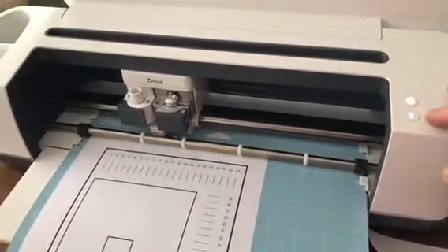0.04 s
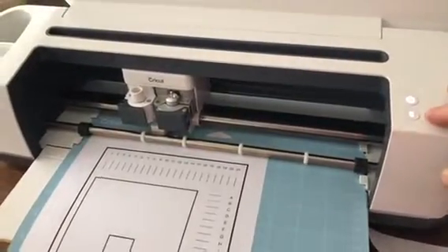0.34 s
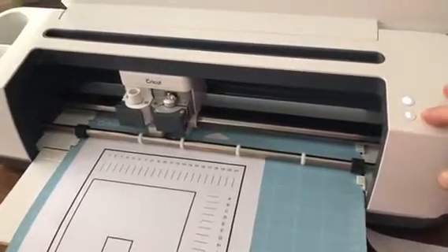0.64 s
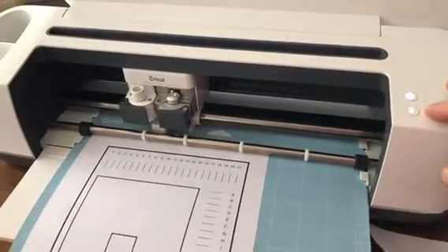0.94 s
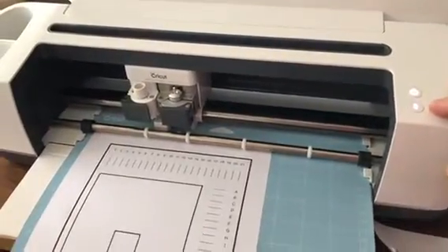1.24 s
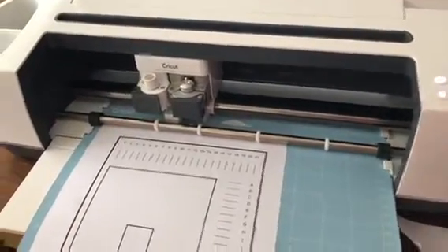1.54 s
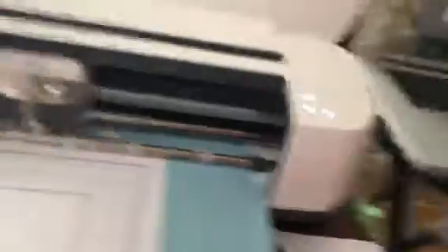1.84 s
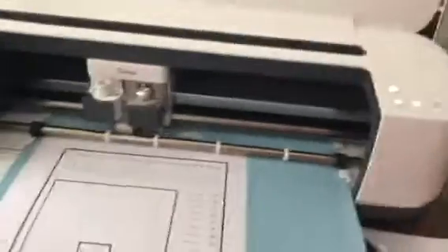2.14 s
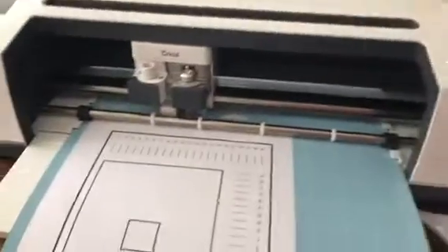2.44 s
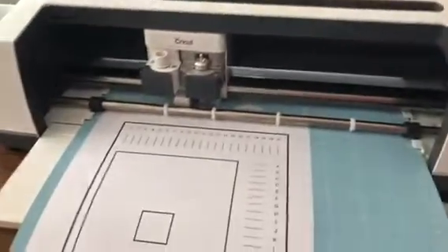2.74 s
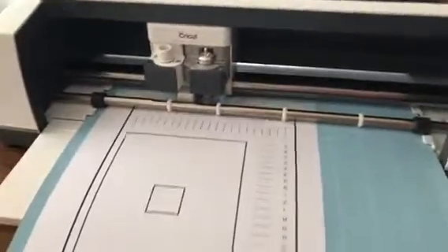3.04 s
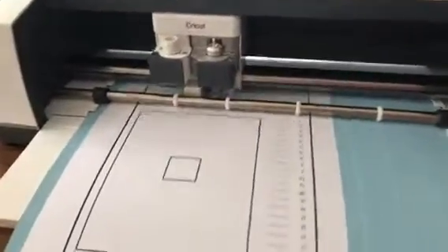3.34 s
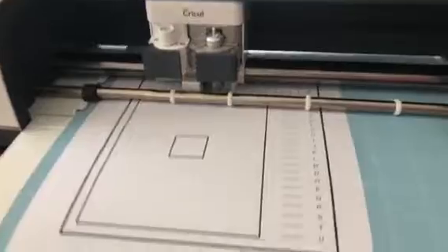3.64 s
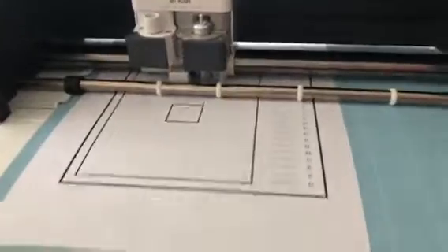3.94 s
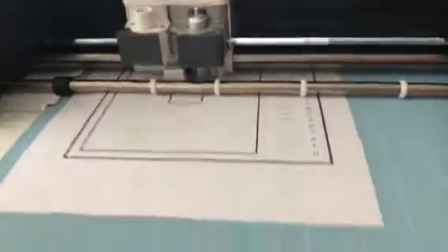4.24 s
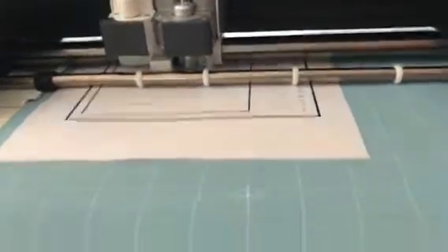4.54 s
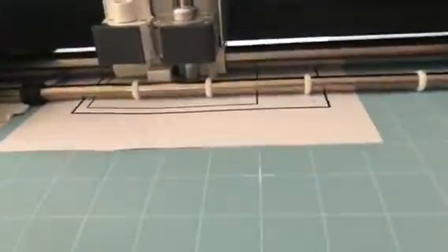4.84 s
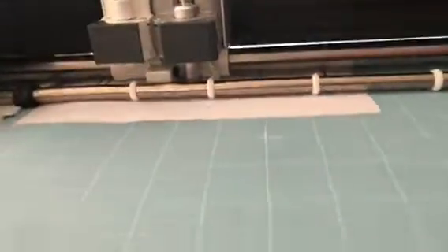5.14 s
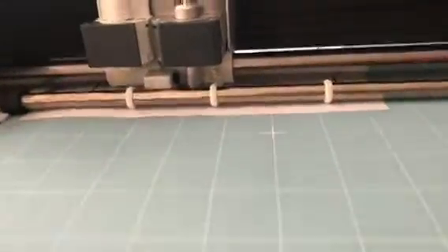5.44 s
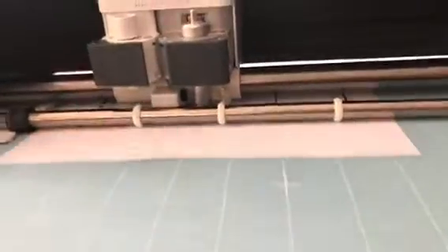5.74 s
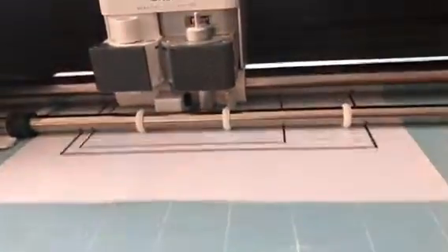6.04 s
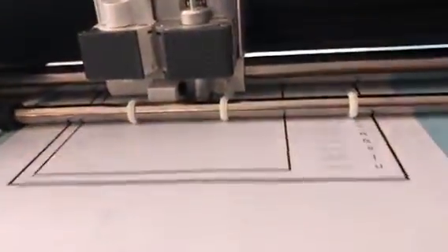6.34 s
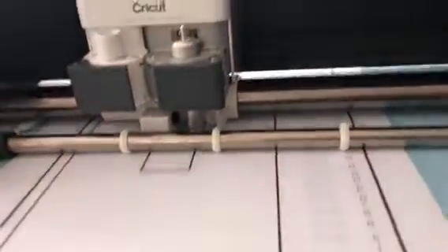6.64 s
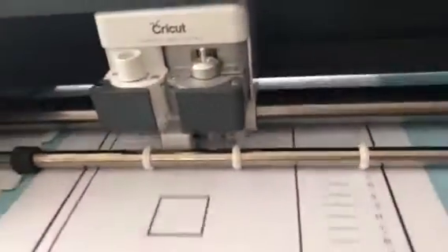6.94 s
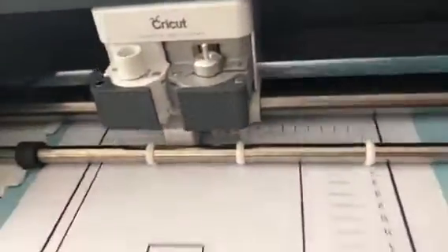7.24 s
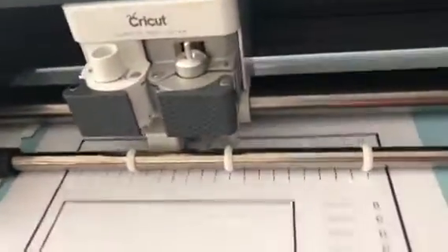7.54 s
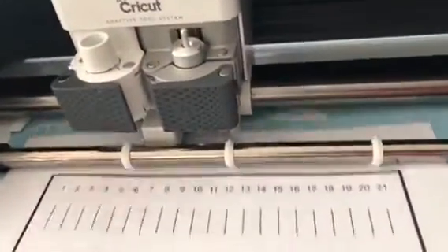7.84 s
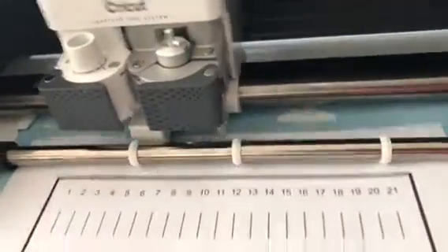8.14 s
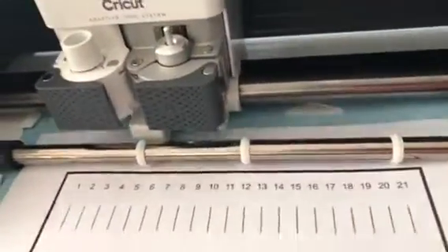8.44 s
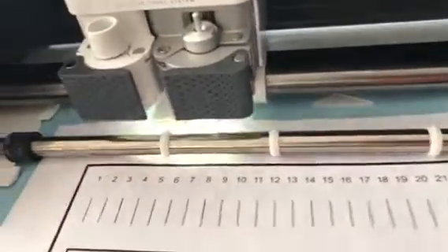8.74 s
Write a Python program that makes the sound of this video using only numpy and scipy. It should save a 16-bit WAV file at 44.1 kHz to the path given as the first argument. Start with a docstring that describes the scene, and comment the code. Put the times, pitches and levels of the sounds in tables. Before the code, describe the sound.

In a quiet room, a button clicks softly and a hand bumps and rubs the microphone. A small electric cutting machine then feeds a mat in with a steady geared whine, a low hum and a sliding hiss. It stops for an instant with a clack and feeds the mat back out, a little louder. After a short jog, the carriage creeps along with light ticks and squeaks, and the tool head clacks down close by.

```python
"""A small cutting machine in a quiet room.

A button clicks, and a hand bumps and rubs the microphone. A geared servo feeds a mat in,
stops and feeds it out: meshing teeth whine, sliding friction rumbles and hisses, the overhanging
mat hums and the drive whistles. After a short jog the carriage creeps along its rail, ticking
and squeaking, and the tool head clacks down."""
import sys
import numpy as np
from scipy import signal
from scipy.fft import rfft, irfft
from scipy.io import wavfile

SR = 44100
rng = np.random.default_rng(int(sys.argv[2]) if len(sys.argv) > 2 else 0)


def output_pcm(signal):
    """Save a mono or channel-first signal as 16-bit PCM at the path in sys.argv[1].

    Samples are clipped to [-1, 1] before scaling.
    """
    pcm = np.clip(np.atleast_2d(signal).T, -1, 1) * 32767
    wavfile.write(sys.argv[1], SR, np.round(pcm).astype(np.int16))


N = 396900
T = np.arange(N) / SR
BINS = np.fft.rfftfreq(N, 1 / SR)
CRUISE_HZ, PINION_TEETH = 62.28, 11  # shaft turns per second, teeth meshed per turn

# Moves of the mat: start_s, stop_s, direction (0 in, 1 out)
FEEDS = [(2.929, 5.537, 0), (5.537, 8.147, 1), (8.155, 8.365, 1)]
# Gear load as the mat's weight shifts, feeding in and feeding out: time_s, load_db, tooth_tone_db
LOAD_IN = [(3.12, -34.5, -39.5), (3.98, -32.5, -33.5), (5.08, -25, -29.5), (5.38, -28.5, -35.5)]
LOAD_OUT = [(5.7, -23, -34), (5.98, -21, -29), (6.4, -20, -27.5), (7.96, -26.5, -31)]
# Spectrum of an impact in the mechanism: frequency_hz, level_db
CLACK_SPECTRUM = [(59, -36), (100, -8), (310, 3), (867, 1), (1290, -1.5), (1920, -13), (2630, -17.5),
                  (3920, -24.5), (5370, -28), (6220, -39), (8000, -35.5), (13000, -48.5), (15000, -37)]


def servo_motion(ramp_s=.105, push_db=1.5, wheel_ratio=9.77, tightest_mesh_s=4.33):
    """Trapezoidal motion: the servo speeds up, cruises and brakes; its sounds follow these controls."""
    pressure_db = np.array([-1, -8.5, -9.5])  # tooth pressure while the speed changes, for each move
    starts, stops, directions = np.transpose(FEEDS)
    move = np.maximum(np.searchsorted(starts, T, side="right") - 1, 0)
    since, left, out = T - starts[move], stops[move] - T, directions[move]
    speed = np.clip(np.minimum(since, left) / ramp_s, 0, 1)
    step = CRUISE_HZ * speed * (1 + .00089 * drift(50)) / SR
    net_turns = np.cumsum(step * (1 - 2 * out))
    wheel_angle = 2 * np.pi * (net_turns - np.interp(tightest_mesh_s, T, net_turns)) / wheel_ratio
    loads = [curve(rows) - np.mean(rows, axis=0)[1] for rows in (LOAD_IN, LOAD_OUT)]
    return dict(speed=speed, out=out, since=since, turns=np.cumsum(step), wheel=wheel_angle,
                load_db=by_direction(loads, out), travel=np.clip(since / (stops[0] - starts[0]), 0, 1),
                ramp_db=pressure_db[move] + push_db * np.sign(left - since))


def gear_whine(servo, scatter_rad=.94, chatter=.37, hop=50):
    """Gear meshing: tooth tones and shaft sidebands sweep through the frame's resonances with speed."""
    # Partials of the gear train and of its slower wheels: shaft_multiple, in_db, out_db
    gear_partials = [(5, -60, -53.5), (6, -61, -58.5), (6.99, -56, -46), (8, -52, -47), (9, -54.5, -48.5),
                     (10, -51.5, -50), (12, -45, -43), (13, -53, -35.5), (14, -42, -38.5), (15, -62, -61.5),
                     (15.98, -53.5, -65), (17, -57, -62.5), (18, -46.5, -39), (19, -43, -34),
                     (20, -53, -36), (21, -42, -45), (23, -54.5, -35), (24.06, -51.5, -44.5),
                     (25, -71, -52.5), (27, -57, -49.5), (28, -59, -55.5), (29, -56, -51.5), (30, -58, -55),
                     (32, -55, -60), (33, -53.5, -47.5), (34, -52, -60), (37, -72, -53.5), (40, -58.5, -60),
                     (42, -68, -56), (44, -58, -54.5), (45, -61.5, -60), (50, -64, -68), (53, -74, -56),
                     (55, -52, -66), (56, -62, -71), (59, -71, -62), (61, -76, -64), (64.3, -79, -60),
                     (66, -66, -67), (78, -80, -66)]
    slow_partials = [(1.36, -64, -61.5), (2.27, -57, -57), (2.68, -56, -55), (3.333, -47.5, -43.5),
                     (4.44, -45.5, -45), (20.66, -44, -42), (21.35, -60, -43), (23.26, -50, -63),
                     (24.43, -55, -60), (34.33, -56.5, -53), (53.4, -65, -72), (56.4, -56.5, -70)]
    # Resonances of the frame: centre_hz, width_hz, lift_db
    frame_modes = [(300, 84, 7.5), (813, 83, 10), (1195, 53, 15.5), (1790, 49, 14.5)]
    changing = np.minimum(10 * abs(1 - servo["speed"]), 1)
    t, glide = T[::hop], changing[::hop]
    speed, out, load_db = (servo[key][::hop] for key in ("speed", "out", "load_db"))
    eccentricity = np.cos(servo["wheel"][::hop])  # the big wheel runs off centre
    swing_db = eccentricity * by_direction((4.1, 1.3), out)
    tooth_db = by_direction([curve(rows, t, column=2) for rows in (LOAD_IN, LOAD_OUT)], out)
    tooth_db += by_direction((.6, .4), out) + eccentricity * by_direction((.5, 1.5), out)
    octave_db = by_direction((-33.5, -23.5), out) + load_db + swing_db
    pressure_db = glide * servo["ramp_db"][::hop]
    rattle_db = by_direction((1.5, -1), out) + by_direction((.53, 1.6), out) * load_db + .5 * swing_db
    sing_db = by_direction((-4, -3), out) + by_direction((10, 9.5), out) * servo["travel"][::hop] ** 2

    sidebands = [(round(k), by_direction(levels, out)) for k, *levels in gear_partials]
    sidebands += [(k, by_direction(levels, out)) for k, *levels in slow_partials]
    for k in np.setdiff1d(np.arange(25, 80), [k for k, _ in sidebands]):
        in_db, out_db = -63 - 7 * np.log2(k / 22) + 3 * rng.standard_normal(2)
        sidebands.append((k, by_direction((in_db, out_db + 4), out)))  # faint lines from uneven teeth
    partials = [(k * PINION_TEETH, db + pressure_db + .87 * drift(25, t))
                for k, db in ((1, tooth_db), (2, octave_db))]
    for k, db in sidebands:
        wander_db, waver_db = 2.5 * drift(2.47, t), drift(25, t)
        db = db + waver_db - 3 * glide + wander_db * (k > 25)
        db += rattle_db * (17 < k < 25)  # lines around the tooth tone's octave follow the load
        db += sing_db * (k > 50)  # the highest lines grow through a move
        partials.append((k, db))

    shaft_angle, whine = 2 * np.pi * servo["turns"], np.zeros(N)
    for k, db in partials:
        sweep_db = lift_db(frame_modes, k * CRUISE_HZ * speed) - lift_db(frame_modes, k * CRUISE_HZ)
        gain = np.repeat(amp(db + sweep_db), hop)[:N]
        phase = scatter_rad * rng.standard_normal()  # nearly in step: one knock a turn
        whine += gain * np.cos(k * shaft_angle + phase)
    return np.sqrt(2) * whine * servo["speed"] ** 1.17 * (1 + chatter * changing * drift(500))


def rubbing(servo, squeal_hz=9170, squeal_width_hz=170):
    """Sliding friction: noise from teeth and rollers, amplitude-modulated by each turn and tooth."""
    # Noise density of the friction: frequency_hz, in_db, out_db
    friction_spectrum = [(30, -121, -123), (76.6, -78, -72.5), (207, -71, -66.5), (495, -68.5, -65.5),
                         (706, -71, -69.5), (1010, -82, -76), (1470, -76, -75), (2220, -81, -75.5),
                         (3160, -82, -83), (4030, -88, -84.5), (6900, -94.5, -92.5), (8970, -99, -89),
                         (10900, -101, -98.5), (12200, -100, -92), (15500, -100, -97.5)]
    # Resonances of the plastic case: centre_hz, width_hz, lift_db
    case_modes = [(262, 19.6, 15.5), (802, 75, 9.5), (1293, 122, 13.5), (3450, 110, 6), (8260, 250, 3)]
    speed, turns, out, travel = (servo[key] for key in ("speed", "turns", "out", "travel"))
    in_and_out = []
    for column in (1, 2):
        body_db = colour(friction_spectrum, BINS, column) + lift_db(case_modes, BINS)
        # The hiss slowly changes colour as the microphone moves: two rippled spectra crossfade.
        early, late = (noise(body_db + 2.5 * drift(60, BINS / 2500) * (BINS > 1800)) for _ in range(2))
        in_and_out.append(early * np.sqrt(1 - travel) + late * np.sqrt(travel))
    friction = by_direction(in_and_out, out)

    lows = signal.sosfiltfilt(signal.butter(4, 1800, fs=SR, output="sos"), friction)
    shake = np.maximum(speed, smooth(speed, time_s=.0075))  # the case rumbles on just after a stop
    rumble = lows * amp(1 + .39 * servo["load_db"]) * shake ** .58

    bite = (1 + .23 * np.cos(2 * np.pi * PINION_TEETH * turns)) * amp(.7 * drift(1600))
    near_db = np.interp(T, (3.28, 5.48), (-2, 2.5))  # the hiss grows as the microphone closes in
    end_db = out * np.interp(travel, (.66, 1), (0, 1.5))  # it swells late in the feed out
    hiss = (friction - lows) * bite * amp(near_db + end_db + .04 * servo["load_db"]) * speed ** 1.65

    # The mat squeals on its guides.
    squeal_band = unit(noise(-20 * np.log10(1 + ((BINS - squeal_hz) / squeal_width_hz) ** 2)))
    squeal_db = by_direction((-77, -55), out) + by_direction((10, -6), out) * travel
    squeal = squeal_band * amp(squeal_db + 3.6 * drift(130)) * speed ** 2
    pulse = 1 + .15 * np.cos(2 * np.pi * turns) + .034 * np.cos(2 * servo["wheel"])
    return pulse * (rumble + hiss + squeal)


def mat_hum(servo, pitch_hz=(98.6, 101), full_db=(-42, -34.5), full_s=(.98, 1.47),
            rise_db_per_s=18, sag_db_per_s=(-.5, 9)):
    """Resonance: the overhanging mat builds up a hum at its own pitch and rings on briefly at a stop."""
    out = servo["out"]
    past_full_s = servo["since"] - by_direction(full_s, out)
    level_db = by_direction(full_db, out) + rise_db_per_s * np.minimum(past_full_s, 0)
    level_db -= by_direction(sag_db_per_s, out) * np.maximum(past_full_s, 0)
    envelope = smooth(servo["speed"] * amp(level_db), time_s=.056)
    phase = 2 * np.pi * np.cumsum(by_direction(pitch_hz, out)) / SR + .34 * drift(8.2)
    return np.sqrt(2) * amp(1.4 * drift(15)) * envelope * np.sin(phase)


def drive_whistle(servo, chopper_hz=15003, commutator_bars=5, run_db=-67, hold_db=-75):
    """Amplitude modulation: commutator bars split the chopper's tone; a hiss surges in the jog."""
    speed = servo["speed"]
    powered = (T > FEEDS[0][0]) * (T < FEEDS[-1][1])
    level = powered * (amp(hold_db) * (1 - speed) + amp(run_db) * speed) * amp(4 * drift(30))
    ripple = 1 + .49 * np.cos(2 * np.pi * commutator_bars * servo["turns"])
    tone = np.sqrt(2) * np.sin(2 * np.pi * chopper_hz * T + .35 * drift(400))
    band = [(13000, -50), (14600, -14), (15000, 0), (15400, -14), (16000, -30)]  # frequency_hz, level_db
    surge = scrape([(8.235, .04, -56)], band, rise_db_per_s=130, fall_db_per_s=300, grain_db=2)
    return level * ripple * tone + surge


def button_clicks():
    """Impact excitation: the button's clicks set the modes of the lid ringing."""
    # Clicks of the button: start_s, level_db, tilt_db_per_octave
    clicks = [(1.367, -40.5, 0.5), (1.5195, -37, 1), (1.5395, -52, 3)]
    # Spectrum of a click: frequency_hz, level_db
    click_spectrum = [(120, -39), (220, -18.5), (340, -7), (520, 1.5), (790, -12.5), (1070, -5.5),
                      (1880, -12), (2500, -20.5), (3000, -17.5), (4400, -27.5), (5760, -23.5), (6800, -33),
                      (15000, -38)]
    # Resonances of the lid: pitch_hz, level_db, t60_s
    lid_modes = [(417, 8.5, .17), (590, 2, 0.171), (985, -9, .08), (1949, -13.5, .07), (2977, -15, .05)]
    return knocks(clicks, click_spectrum, lag_cycles=2, rattle=1.9, rattle_s=.0042,
                  modes=lid_modes, ring=.0044)


def mechanism_clacks():
    """Backlash and impact: the gears take up slack, the carriage knocks and the tool head drops."""
    # Blows in the mechanism: start_s, level_db, tilt_db_per_octave
    impacts = [(2.936, -46, -1.5), (5.545, -33, -1.5), (5.555, -32.5, -4.5), (8.157, -35, 0.5),
               (8.267, -33, 5), (8.559, -44, 3.5), (8.587, -44.5, 1), (8.646, -39.5, 2),
               (8.728, -47.5, -1.5), (8.885, -50.5, 5), (8.895, -49, -2), (8.954, -47, 2), (8.9635, -38, 2),
               (8.969, -35, -7), (8.984, -37, -5)]
    return knocks(impacts, CLACK_SPECTRUM, lag_cycles=1.602, rattle=3, rattle_s=.0091)


def carriage(first_tick_s=8.4, tick_gap_s=.041, tick_db=-46):
    """Friction and light impacts: the carriage creeps along its rail, squeaking and ticking unevenly."""
    # Strokes of creeping and of squeaking on the rail: start_s, length_s, level_db
    creep_strokes = [(8.15, .54, -46.5), (8.795, 0.037, -51)]
    squeak_strokes = [(8.646, .005, -42), (8.697, .004, -49), (8.728, .006, -39), (8.835, .012, -50.5)]
    # Their spectra: frequency_hz, level_db
    creep_spectrum = [(29, -53.5), (50, -18), (113, -5), (211, -9), (256, 0), (489, -6), (1280, -3),
                      (1920, -21), (2750, -21), (3850, -31), (5520, -31), (6230, -42), (8110, -32.5),
                      (12500, -47.5), (15500, -27)]
    squeak_spectrum = [(400, -32), (1100, -8), (1320, 7), (1550, -26), (4000, -44)]
    ticks = [(first_tick_s + tick_gap_s * (k + .12 * late), tick_db - softer_db, 1)
             for k, (late, softer_db) in enumerate(rng.standard_normal((5, 2)))]
    creep = scrape(creep_strokes, creep_spectrum, rise_db_per_s=448.5, fall_db_per_s=230, grain_db=.2)
    squeaks = scrape(squeak_strokes, squeak_spectrum, rise_db_per_s=3000, fall_db_per_s=1300, grain_db=5)
    return creep + squeaks + knocks(ticks, CLACK_SPECTRUM, lag_cycles=1.63, rattle=1.9, rattle_s=.0076)


def hand():
    """Handling noise: a hand bumps the microphone, slides over it and rustles as it grips."""
    # Bumps of the hand: start_s, level_db, tilt_db_per_octave
    impacts = [(1.7683, -21, 2), (1.770, -29, -15.5), (1.822, -55, 3), (1.925, -52, -28), (1.941, -67, 4),
               (1.965, -46, -1.5), (2.464, -61, 4.5), (2.474, -60.5, -2), (2.575, -74.5, 7)]
    # Strokes of the fingers and of the grip: start_s, length_s, level_db
    slide_strokes = [(1.768, 0.011, -48.5), (1.825, .02, -52), (1.888, 0.012, -60), (1.957, .012, -65),
                     (2.468, 0.011, -64)]
    grip_strokes = [(.16, .17, -63)]
    # Spectra of a bump, a slide and the grip: frequency_hz, level_db
    bump_spectrum = [(25, -29.5), (45, -12), (100, -3.5), (250, -8.5), (480, 3.5), (690, -12.5), (1000, -5),
                     (2000, -15), (3300, -29.5), (4300, -24.5), (5600, -43), (7000, -32.5), (10000, -50.5),
                     (15000, -52)]
    slide_spectrum = [(80, -3), (900, 1.5), (2000, -7), (6000, -15), (15000, -24)]
    grip_spectrum = [(25, -4), (60, 8), (350, -3), (900, -26), (4000, -48)]
    bumps = knocks(impacts, bump_spectrum, lag_cycles=1.4, rattle=.41, rattle_s=.002)
    slides = scrape(slide_strokes, slide_spectrum, rise_db_per_s=700, fall_db_per_s=449, grain_db=4)
    rustle = scrape(grip_strokes, grip_spectrum, rise_db_per_s=380, fall_db_per_s=113, grain_db=-.5)
    return bumps + slides + rustle


def reverberation(x, t60_s, damp_hz):
    """Diffuse reflection: a small furnished room adds a dull tail that decays exponentially."""
    t = T[:SR // 2]
    tail = rng.standard_normal(len(t)) * amp(-60 * t / t60_s) * (t > .005)
    tail = signal.sosfilt(signal.butter(1, damp_hz, fs=SR, output="sos"), tail)
    return signal.oaconvolve(x, tail / np.linalg.norm(tail))[:N]


def room_tone(noise_db=-66.5, hum_db=-70.5, hum_hz=120):
    """Noise floor: a steady low rush with a faint hum."""
    # Spectrum of the ambient noise: frequency_hz, level_db
    air_spectrum = [(20, -30.5), (55, -12), (90, -12.5), (125, -8), (200, -8), (300, -11), (420, -19),
                    (700, -25), (1500, -31.5), (4000, -37), (15500, -42)]
    rush = amp(noise_db) * unit(noise(colour(air_spectrum, BINS)))
    return rush + amp(hum_db) * np.sin(2 * np.pi * hum_hz * T)


def knocks(impacts, spectrum, lag_cycles, rattle, rattle_s, modes=(), ring=0):
    """Impulse response: a snap, rattle and optional ring; the microphone's processing delays the lows."""
    t, mix = T[:8192], np.zeros(N + 8192)
    hz = np.fft.rfftfreq(len(t), 1 / SR)
    low_lag = np.exp(-2j * np.pi * lag_cycles * np.log((hz + 30) / (hz[-1] + 30)))
    ringing = sum(amp(db - 60 * t / t60_s) * np.cos(2 * np.pi * f * t) for f, db, t60_s in modes)
    for start_s, level_db, tilt_db in impacts:
        chatter = rng.standard_normal(len(t)) * np.exp(-t / rattle_s)
        blow = (t == 0) + rattle * chatter / np.linalg.norm(chatter) + ring * ringing
        log_gain = np.log(amp(colour(spectrum, hz) + tilt_db * np.log2(np.maximum(hz, 250) / 1000)))
        mirrored = np.r_[log_gain, log_gain[-2:0:-1]]
        minimum_phase = np.exp(np.conj(signal.hilbert(mirrored)))[:len(hz)]
        hit = irfft(rfft(blow) * minimum_phase * low_lag) * (1 - (t / t[-1]) ** 2)
        hit *= np.sqrt(.02 * SR) / np.linalg.norm(hit)  # the energy of 20 ms at rms 1
        start = round(start_s * SR)
        mix[start:start + len(t)] += amp(level_db) * hit
    return mix[:N]


def scrape(strokes, spectrum, rise_db_per_s, fall_db_per_s, grain_db):
    """Grainy noise under an envelope: each stroke swells, holds for its length and dies away."""
    envelope = np.zeros(N)
    for start_s, length_s, level_db in strokes:
        before_s, after_s = np.clip(start_s - T, 0, 1), np.clip(T - start_s - length_s, 0, 1)
        envelope += amp(level_db - rise_db_per_s * before_s - fall_db_per_s * after_s)
    return envelope * unit(noise(colour(spectrum, BINS)) * amp(grain_db * drift(120)))


def by_direction(pair, out):
    """Picks from a pair of values: (feeding in, feeding out)."""
    return np.where(out, pair[1], pair[0])


def amp(db):
    """Decibels to amplitude."""
    return 10 ** (np.asarray(db) / 20)


def unit(x):
    """Scales to rms 1."""
    return x / np.sqrt(np.mean(x ** 2) + 1e-20)


def curve(rows, t=T, column=1):
    """One column of a table, interpolated in time."""
    rows = np.array(rows)
    return np.interp(t, rows[:, 0], rows[:, column])


def colour(rows, hz, column=1):
    """A spectrum in dB, interpolated in log frequency."""
    rows = np.array(rows)
    return np.interp(np.log(hz + 1), np.log(rows[:, 0]), rows[:, column])


def lift_db(modes, hz):
    """The gain of a set of bell-shaped resonances at each frequency."""
    return sum(db * np.exp(-.5 * ((hz - centre) / width) ** 2) for centre, width, db in modes)


def noise(density_db):
    """Noise with the given power spectral density."""
    return irfft(rfft(rng.standard_normal(N)) * amp(density_db), N) * np.sqrt(SR / 2)


def drift(rate, t=T):
    """Random fluctuation of rms 1, with `rate` new values per unit of t."""
    knots = np.arange(0, 10, 1 / rate)
    return unit(np.interp(t, knots, rng.standard_normal(len(knots))))


def smooth(x, time_s):
    """First-order lag with the given time constant."""
    pole = np.exp(-1 / (time_s * SR))
    return signal.lfilter([1 - pole], [1, -pole], x)


def scene():
    """Superposition: the machine, the hand and the room add in one channel."""
    servo = servo_motion()
    motor = gear_whine(servo) + mat_hum(servo) + rubbing(servo) + drive_whistle(servo)
    button, clacks, air = button_clicks(), mechanism_clacks(), room_tone()
    echo = reverberation(amp(-18) * button + amp(-22) * clacks, t60_s=.3, damp_hz=3916)
    echo += reverberation(amp(-20) * motor, t60_s=.15, damp_hz=5000)
    return (motor + button + clacks + carriage() + hand() + air + echo)[None]


def record(dry, cutoff_hz=15800):
    """Band limiting: a steep low-pass filter removes the highest treble."""
    lowpass = signal.firwin(511, cutoff_hz, window=("kaiser", 9), fs=SR)
    return signal.oaconvolve(dry, lowpass[None], "same")


dry = scene()
out = record(dry)
output_pcm(out)
```